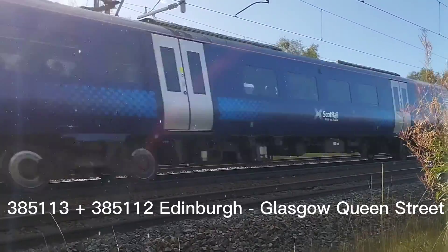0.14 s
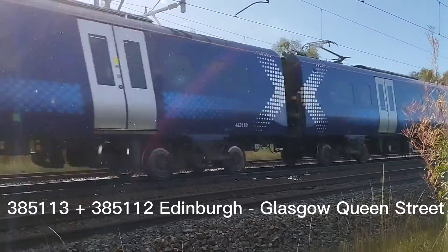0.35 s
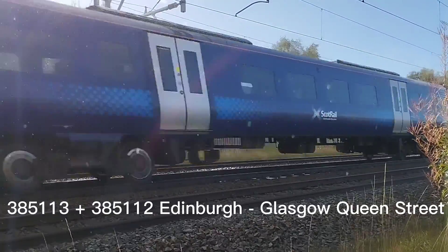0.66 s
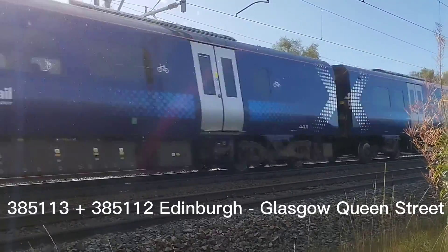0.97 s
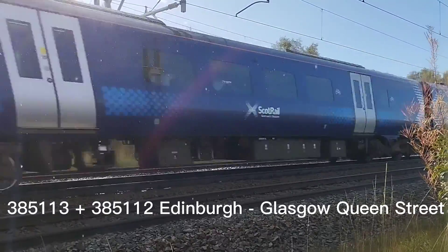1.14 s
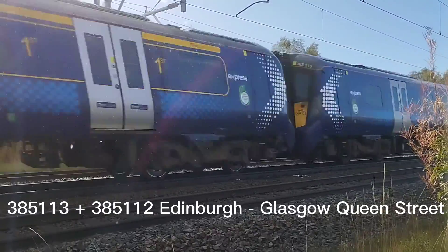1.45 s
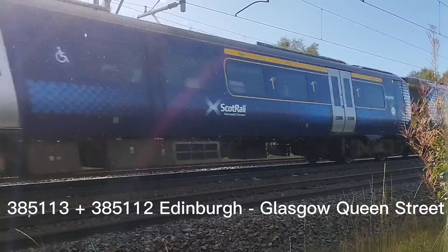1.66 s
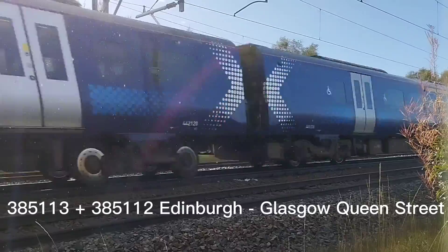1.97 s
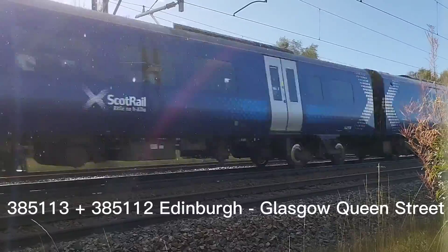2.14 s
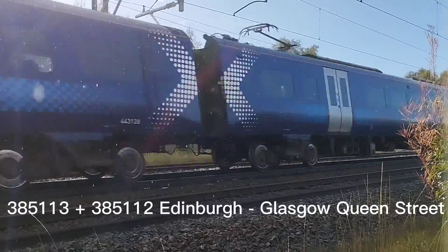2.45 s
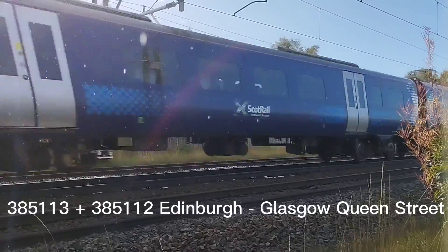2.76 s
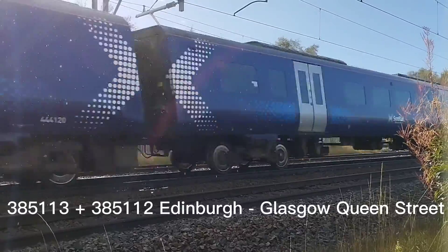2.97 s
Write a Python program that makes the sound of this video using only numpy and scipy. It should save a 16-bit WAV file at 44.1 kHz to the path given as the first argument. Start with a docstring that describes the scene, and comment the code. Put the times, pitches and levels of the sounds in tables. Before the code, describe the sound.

A fast electric train rushes past close by, wheels roaring, thudding and singing over a low rumble.

```python
"""A fast electric train rushes past from left to right, heard from beside the track on two microphone ports.
Each pair of bogies is two moving sources of rolling noise, joined by a wide rush from the whole train and bank.
Broad resonances of the ground and ports colour the rush, a rail rings in a narrow line, and wheels thud as soft
low knocks. Wheels sing as narrow rough tones that swell and fall in pitch, and the rail sings near 675 Hz.
Underneath, axles over sleepers drone as a narrow band of noise, beating with a slightly higher boom of the bed."""
import sys
import numpy as np
from scipy import signal
from scipy.fft import rfft, irfft
from scipy.io import wavfile
from scipy.ndimage import uniform_filter1d, map_coordinates

SR = 44100
rng = np.random.default_rng(int(sys.argv[2]) if len(sys.argv) > 2 else 0)


def persist_wave(psi):
    """Save psi, clipped to +-1, as 16-bit WAV."""
    counts = np.round(np.clip(psi, -1, 1) * 32767).astype(np.int16)
    wavfile.write(sys.argv[1], SR, np.atleast_2d(counts).T)


N = 136710

SPEED_M_PER_S, DISTANCE_M, SOUND_M_PER_S = 41, 8.5, 343
PORT_GAP_M, PORT_ANGLE_RAD = .19, .3   # the port axis is turned from the track
LAG_S, BASS_LAG_S = .0005, .00038   # right port behind left, for treble and bass tones
BASS_TREBLE_HZ = 940   # where bass and treble part

# Two bogies per row. Each row: time abreast of the listener in seconds, relative level in dB.
BOGIE_PAIRS = [(-.2, 4.5), (.34, 4), (.87, 0.3), (1.44, 0.9), (1.98, 0.5), (2.52, 0.5), (3.07, -1.3),
               (3.62, -2.5)]
PAIR_GAP_S = .13   # between the two bogies of a pair
# Shading of a bogie as it draws level, bass row then treble row.
# Each row: middle of the fade in seconds after abreast, time scale of the fade in seconds.
SHADING = [(.14, .05), (-.12, .07)]


def bogies():
    """Moving sources: propagation delay gives Doppler shift, and pressure falls as one over distance."""
    bands = np.zeros((2, 2, N))   # bass and treble, each with left and right
    fade_middle, fade_time = np.transpose(SHADING)[:, :, None]
    half_along = PORT_GAP_M / 2 * np.cos(PORT_ANGLE_RAD)
    half_across = PORT_GAP_M / 2 * np.sin(PORT_ANGLE_RAD)
    for pair_s, db in BOGIE_PAIRS:
        for abreast_s in (pair_s - PAIR_GAP_S / 2, pair_s + PAIR_GAP_S / 2):
            noise = rolling()
            first = max(int((abreast_s - .9) * SR), 0)
            last = min(int((abreast_s + .45) * SR), N)
            i = np.arange(first, last)
            t = i / SR - abreast_s
            shade = 1 / (1 + np.exp((t - fade_middle) / fade_time))
            fade_in = np.clip((t + .9) / .3, 0, 1)
            gain = amp(db) * shade * fade_in
            for ch, side in enumerate((1, -1)):
                along = -SPEED_M_PER_S * t - side * half_along
                distance = np.hypot(along, DISTANCE_M - side * half_across)
                emitted = (t + 1.2 - distance / SOUND_M_PER_S) * SR
                heard = map_coordinates(noise, [emitted], order=3, prefilter=False)
                bands[:, ch, i] += gain / distance * heard
    hz = np.fft.rfftfreq(N, 1 / SR)
    low = 1 / (1 + (hz / BASS_TREBLE_HZ) ** 4)
    flat = np.sinc(hz / SR) ** -4   # undoes the treble loss of spline interpolation
    bass = filtered(rms_one(filtered(bands[0], flat)), low)
    treble = filtered(rms_one(filtered(bands[1], flat)), 1 - low)
    return bass + treble


# Ringing modes of a wheel. Each row: frequency in Hz, width in Hz, mean level in dB against
# the white contact noise.
WHEEL_MODES = [(2000, 40, -20), (2250, 40, -21), (2700, 50, -20), (3200, 50, -21), (3700, 60, -19.5)]
MODE_SPREAD_DB = 2.0   # standard deviation from bogie to bogie


def rolling():
    """Modal excitation: white contact noise with wheel modes ringing at strengths drawn for each bogie."""
    contact = rng.standard_normal(2 * SR)
    out = contact.copy()
    for hz, width_hz, db in WHEEL_MODES:
        ringing = resonance(contact[::-1], hz, width_hz)   # reversed, so unlike the contact noise
        strength = amp(db + MODE_SPREAD_DB * rng.standard_normal())
        out += strength * rms_one(ringing)
    return out


# Wide rush of train and bank. Each row: frequency in Hz, level in dB against the bogies.
WIDE_OVER_BOGIES = [(25, -22), (60, -23), (200, -18.5), (700, -9.5), (2000, -0.5), (3500, 0), (5000, 7),
                    (12000, 7.5)]
# Colour of the rush, with ground and casing. Each row: frequency in Hz, relative spectral level in dB.
RUSH_COLOUR = [(20, -40.5), (45, -28.5), (70, -32), (105, -35), (130, -30.5), (170, -32.5), (250, -34),
               (340, -33.5), (450, -40.5), (600, -38), (930, -42), (1130, -41.5), (1400, -38), (1750, -46),
               (2600, -41), (3000, -44), (3500, -46), (5000, -50.5), (6500, -53), (7600, -59),
               (8000, -73.5), (8230, -99), (8450, -75), (8800, -60.5), (10000, -61.5), (10900, -67.5),
               (11600, -58.5), (13000, -57), (15500, -58.5)]
# Resonances colouring the rush: the narrow line near 680 Hz rings from the rail, the broad peaks # from the
# ground and the ports. Each row: frequency in Hz, full width at half the lift in Hz, lift at the centre in dB.
COLOUR_RESONANCES = [(718, 200, 8), (682, 12.5, 4.0), (2079, 620, 8.5), (1530, 61, 2.5), (3280, 270, 0)]
# Balance of the ports. Each row: frequency in Hz, left over right in dB.
LEFT_OVER_RIGHT = [(2000, -0.2), (3300, -2.5), (4500, -2), (6000, -6.5), (7300, -2), (9000, -0.5),
                   (11000, 3.5), (12500, 9.5), (15000, 1)]
# Swells of six bands, each heard against its own mean over the rows. Each row: time in seconds, then
# level of bass, rail hum, middle, ring band, treble and top, all in dB.
BAND_LEVELS = [(0.0, -19, -21.5, -22, -23, -22, -32), (0.09, -22, -23, -27, -15.5, -23.5, -35),
               (0.15, -17, -23, -25.5, -19.5, -22, -32), (0.24, -23, -27.5, -28, -20.5, -24.5, -38),
               (0.34, -21, -25, -28.5, -15.5, -21.5, -32), (0.37, -21.5, -23, -27, -17, -23.5, -34),
               (0.61, -21.5, -24, -28, -17, -26.5, -35.5), (0.66, -21.5, -22.5, -25, -18, -24.5, -35.5),
               (0.8, -22, -23.5, -31, -19, -25, -35.5), (1.01, -19.5, -23.5, -26.5, -19.5, -25, -37),
               (1.08, -17.5, -26.5, -25, -18.5, -26.5, -35.5), (1.17, -24, -19, -32.5, -21, -25.5, -38),
               (1.22, -19, -21, -27.5, -15.5, -24.5, -35), (1.3, -19, -26.5, -26, -23, -25, -38.5),
               (1.37, -23, -23.5, -30.5, -17.5, -25.5, -36), (1.54, -21.5, -24, -26, -23, -24, -35.5),
               (1.59, -19, -19, -23.5, -18.5, -21.5, -30.5), (1.83, -20.5, -24.5, -30, -18.5, -25, -36.5),
               (1.93, -21.5, -24.5, -28, -20, -23.5, -33.5), (2.24, -21.5, -23, -27.5, -19, -22.5, -33),
               (2.33, -20, -23, -29, -16.5, -21.5, -33.5), (2.63, -23, -27, -30.5, -22, -22, -34.5),
               (2.68, -22.5, -22.5, -30.5, -16, -22.5, -31.5), (2.9, -18, -23.5, -26, -20, -22, -33),
               (3.02, -22, -23.5, -36, -16.5, -24, -33), (3.1, -21, -22.5, -22.5, -25, -21.5, -34)]
# Edges between the six bands, rising. Each entry: frequency in Hz.
BAND_EDGES = [450, 900, 1750, 2700, 8200]
RUSH_DB, FLICKER_DB = -13.5, 1.5   # overall rms level, rms depth of the flicker


def rush():
    """Filtered noise: bogies and a diffuse field are coloured by resonance, then six bands swell and flicker."""
    hz, t = np.fft.rfftfreq(N, 1 / SR), np.arange(N) / SR
    wide = amp(at_hz(WIDE_OVER_BOGIES, hz))
    diffuse = rfft(rng.standard_normal((2, N)))   # independent at the two ports
    spectrum = (rfft(bogies()) + wide * diffuse) / np.sqrt(1 + wide ** 2)
    colour_db = at_hz(RUSH_COLOUR, hz)
    for centre, width, lift_db in COLOUR_RESONANCES:
        colour_db = colour_db + lift_db / (1 + (2 * (hz - centre) / width) ** 4)
    spectrum *= amp(colour_db + at_hz(LEFT_OVER_RIGHT, hz) * [[.5], [-.5]])
    level_s, *levels = np.transpose(BAND_LEVELS)
    below = [0] + [1 / (1 + (hz / edge) ** 8) for edge in BAND_EDGES] + [1]
    out = 0
    for k, level in enumerate(levels):
        band = irfft(spectrum * (below[k + 1] - below[k]), N)
        own_power = uniform_filter1d(np.mean(band ** 2, 0), size=SR // 6)
        flicker = FLICKER_DB * np.array([drift(15), drift(23.0)])   # left, right
        swell = np.interp(t, level_s, level - np.mean(level)) + flicker
        evened = band * np.sqrt(own_power.mean() / own_power)
        out = out + evened * amp(swell)
    return amp(RUSH_DB) * rms_one(out)


# Wheel thuds. Each row: start in seconds, approximate peak in dB before THUD_DB is added, frequency in Hz.
WHEEL_THUDS = [(0.108, -10.5, 192), (0.157, -4.5, 186), (0.368, -8.5, 173), (0.539, -10, 178),
               (0.645, -5.5, 223), (0.702, -8, 151), (0.752, -13, 166), (1.015, -9, 215), (1.075, -11, 163),
               (1.128, -10, 146), (1.212, -5, 221), (1.272, -7.5, 166), (1.586, -7, 164),
               (1.639, -6.5, 154), (1.695, -9, 140), (1.747, -8, 220), (1.799, -4.5, 177), (2.123, -9, 223),
               (2.175, -7.5, 194), (2.232, -13, 170), (2.288, -7, 190), (2.339, -6, 198),
               (2.488, -14.5, 169), (2.55, -13.5, 189), (2.658, -8, 155), (2.712, -7.5, 190),
               (2.821, -8.5, 227), (2.881, -7.5, 156), (2.932, -11.5, 162)]
THUD_CYCLES, THUD_DB = 4.06, 2   # cycles to decay by 30 dB, level added to every thud
PUSH_DB = -8   # the tone an octave lower, against the thud


def thuds():
    """Damped oscillation: each knock is a decaying sine with a soft rise and a push an octave lower."""
    out = np.zeros(N + SR)
    for start_s, db, hz in WHEEL_THUDS:
        cycles = np.arange(int(3 * THUD_CYCLES / hz * SR)) * hz / SR
        i = int(start_s * SR)
        knock = np.sin(2 * np.pi * cycles) + amp(PUSH_DB) * np.sin(np.pi * cycles)
        rise = 1 - np.exp(-cycles / 0.63)
        decay = amp(-30 * cycles / THUD_CYCLES)
        # doubled to offset what rise and decay take from the peak
        out[i:i + len(cycles)] += 2 * amp(db + THUD_DB) * knock * rise * decay
    return later_right(out[:N])


# Tones singing as the train passes, mostly wheels; the rows near 675 Hz are the rail ringing. # Each row:
# middle in seconds, half length in seconds, frequency at the # middle in Hz, nominal width in Hz, nominal level
# in dB, left over right in dB, fall in Hz per second.
SONGS = [(0.392, .11, 1298, 30, -22, 10, 150), (.3, .05, 1370, 60, -27, 5, 199),
         (0.405, .12, 3210, 300, -27, 1, 488), (2.303, .1, 4060, 251, -29, .1, 494),
         (.2, 0.084, 1470, 58.5, -24, -1, 300), (0.172, 0.085, 2250, 61, -25, -6, 199),
         (.09, 0.076, 2350, 52, -22.5, 4, 500), (.03, .06, 1940, 45, -25.5, 5, 200),
         (.33, .09, 2005, 130.2, -19, 5, 600), (0.293, 0.069, 2170, 70, -27, 0, 300),
         (0.264, 0.066, 3600, 69.6, -37, 4, 1500), (.58, .14, 2200, 80, -24.5, -1, 500),
         (.58, .08, 3000, 70, -28, -8, 1196), (0.697, 0.11, 350, 60.5, -27, -7, 149),
         (.76, 0.064, 2270, 60, -23, -2, 300), (0.801, .11, 2054, 70.5, -18.5, 1, 1100),
         (0.774, 0.09, 990, 30, -29, 4, 400), (.92, 0.0802, 1950, 40, -24, .1, 100),
         (1.16, 0.131, 2060, 60.15, -21.5, 3, 1100), (1.277, .08, 325, 50.5, -21, -4, 350),
         (1.39, .14, 365, 70, -21.5, -2, 250), (1.35, .09, 2190, 50, -20, -3, 100),
         (1.406, .1, 2020, 45, -20, 2, 1400), (1.6, .12, 1932, 129.9, -20, 5, 700),
         (1.6, 0.1214, 678, 25, -24.5, .1, 29.9), (1.69, .08, 365, 45, -25.5, -1, 50),
         (1.727, .07, 2190, 60, -23, -2, 101), (1.759, .035, 2293, 252.3, -18, -2, 100),
         (1.82, .03, 2280, 150, -23, .1, 99.9), (1.9, 0.13, 2950, 81, -26.5, 9, 400),
         (1.95, 0.16, 5760, 270, -35.5, -22, 1100), (1.97, .08, 675, 25, -23, -3, 30),
         (2.1, .07, 2600, 100, -21, -3, 500), (2.28, .1, 2250, 120, -28.5, 3, 199.9),
         (2.315, 0.152, 3680, 168, -31.5, 5, 1100), (2.31, 0.069, 5800, 200, -31, -12, 1500),
         (2.45, 0.14, 2200, 60, -23.5, -4, 500), (2.49, 0.1, 5680, 260, -32, -15, 1200),
         (2.57, .16, 1920, 50.3, -25, .1, 200), (2.57, 0.165, 1330, 81, -22.5, -2, 500),
         (2.58, .1, 3300, 160, -26, -4, 1100), (2.64, 0.067, 660, 40, -23.5, -2, 150),
         (2.68, .07, 2310, 60, -22.5, 2, 200), (2.76, .09, 2200, 60, -17, 0, 1090),
         (2.84, .04, 2040, 80, -21.5, 6, 300), (2.9, 0.17, 5940, 610, -35.5, -26.5, 505),
         (3.01, .09, 1970, 129.6, -19.5, 4, 890), (2.996, .12, 3960, 120, -36, -4, 1500),
         (3.037, .15, 6200, 794, -29, -17, 400), (3.06, 0.068, 345, 50, -23.5, .1, 29.8),
         (3.08, .08, 1300, 85, -29.5, 14, 496)]
STEADY_HZ = 30   # tones narrower than about this are mostly a steady core
SWELL_POWER = 1.02   # roundness of each swell


def singing():
    """Narrow-band modulation: slow noise on sine and cosine roughens tones that swell, fall in pitch and fade."""
    out = np.zeros((2, N))
    for middle_s, half_s, hz, width_hz, db, pan_db, fall in SONGS:
        i = np.arange(max(int((middle_s - half_s) * SR), 0), min(int((middle_s + half_s) * SR), N))
        u = (i / SR - middle_s) / half_s   # -1 at the start, 1 at the end
        phase = 2 * np.pi * np.cumsum(hz - fall * half_s * u) / SR
        sine_noise, cosine_noise = rng.standard_normal((2, N // 100))
        step = (u + 1) * half_s * width_hz * 2   # two new values per cycle of the width
        points = np.arange(len(sine_noise))
        sine_level = STEADY_HZ / width_hz + np.interp(step, points, sine_noise)
        cosine_level = np.interp(step, points, cosine_noise)
        tone = sine_level * np.sin(phase) + cosine_level * np.cos(phase)
        swell = np.abs(np.cos(np.pi * u / 2)) ** SWELL_POWER
        lag_s = LAG_S if hz > BASS_TREBLE_HZ else BASS_LAG_S
        out[:, i] += later_right(amp(db) * swell * tone, pan_db, lag_s)
    return out


# Wheels over sleepers. Each row: time in seconds, level in dB before DRONE_DB is added.
DRONE_LEVELS = [(0.0, -25), (0.14, -18), (0.21, -25.5), (0.44, -15.5), (0.47, -33), (0.52, -21),
                (0.54, -36), (0.59, -16.5), (0.68, -25), (0.72, -20), (0.91, -19.5), (0.99, -11.5),
                (1.04, -23.5), (1.4, -18), (1.43, -32), (1.48, -12), (1.51, -30), (1.54, -14.5), (1.6, -21),
                (1.64, -17.5), (1.86, -28), (1.91, -12.5), (1.94, -23), (2.01, -15), (2.04, -27),
                (2.08, -18.5), (2.2, -33), (2.3, -16), (2.42, -26), (2.45, -17), (2.49, -24.5),
                (2.62, -16.5), (2.63, -21.5), (3.1, -22.5)]
SLEEPER_M = .612   # sleeper spacing
DRONE_WIDTH_HZ, DRONE_DB, DRONE_TOP_HZ = 8.1, 2, 97.7
BED_HZ, BED_DB = 83.8, -3.5   # boom of the track bed, level against the sleeper tone


def drone():
    """Periodic forcing: a rough tone at the rate axles cross sleepers beats with the boom of the track bed."""
    tone = 0
    for hz, db in ((SPEED_M_PER_S / SLEEPER_M, 0), (BED_HZ, BED_DB)):
        rough = resonance(rng.standard_normal(N + SR), hz, DRONE_WIDTH_HZ)[SR:]
        tone = tone + amp(db) * rms_one(rough)
    tone = tone / np.sqrt(uniform_filter1d(tone ** 2, size=SR // 25))   # evened over 40 ms
    level_s, db = np.transpose(DRONE_LEVELS)
    tone = tone * amp(np.interp(np.arange(N) / SR, level_s, db) + DRONE_DB)
    lowpass = signal.butter(3, DRONE_TOP_HZ, fs=SR, output="sos")
    return later_right(signal.sosfiltfilt(lowpass, tone))


def later_right(x, pan_db=0, lag_s=BASS_LAG_S):
    """Interaural cues: the right lags the left, and pan_db sets left over right."""
    i = np.arange(len(x))
    return np.array([x, np.interp(i - lag_s * SR, i, x)]) * amp([[pan_db / 2], [-pan_db / 2]])


def resonance(x, hz, width_hz):
    """Damped resonator: a pole pair whose radius sets the bandwidth."""
    r = np.exp(-np.pi * width_hz / SR)
    return signal.lfilter([1, 0, -1], [1, -2 * r * np.cos(2 * np.pi * hz / SR), r * r], x)


def drift(rate_hz, count=N):
    """Low-pass noise: slow chance, scaled to an rms of one."""
    r = np.exp(-2 * np.pi * rate_hz / SR)
    return rms_one(signal.lfilter([1], [1, -2 * r, r * r], rng.standard_normal(count + SR))[SR:])


def filtered(x, gain):
    """Linear filtering: multiplication in the spectrum."""
    return irfft(rfft(x) * gain, N)


def at_hz(points, hz):
    """Logarithmic pitch scale: interpolates a table's levels along log frequency."""
    points = np.array(points)
    return np.interp(np.log(hz + 1), np.log(points[:, 0]), points[:, 1])


def amp(db):
    """Decibel law: level to pressure ratio."""
    return 10 ** (np.asarray(db) / 20)


def rms_one(x):
    """Effective value: scales the signal to an rms of one."""
    return x / np.sqrt(np.mean(x ** 2) + 1e-20)


def scene():
    """Superposition: the pressures of all sources add."""
    return rush() + drone() + thuds() + singing()


CUTOFF_HZ = 15550


def record(dry):
    """Saturation and band limiting: peaks are rounded, then the top is cut steeply."""
    rounded = 1.3 * np.tanh(dry / 1.3)
    lowpass = signal.ellip(14, .5, 60, CUTOFF_HZ, fs=SR, output="sos")   # ripple and stopband in dB
    return signal.sosfilt(lowpass, rounded)


dry = scene()
out = record(dry)
persist_wave(out)
```